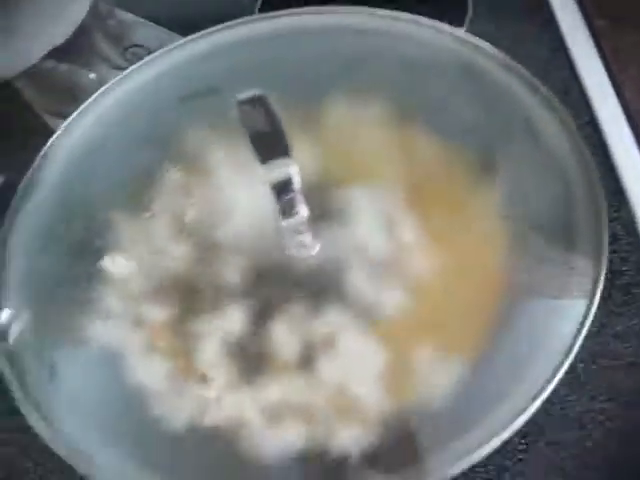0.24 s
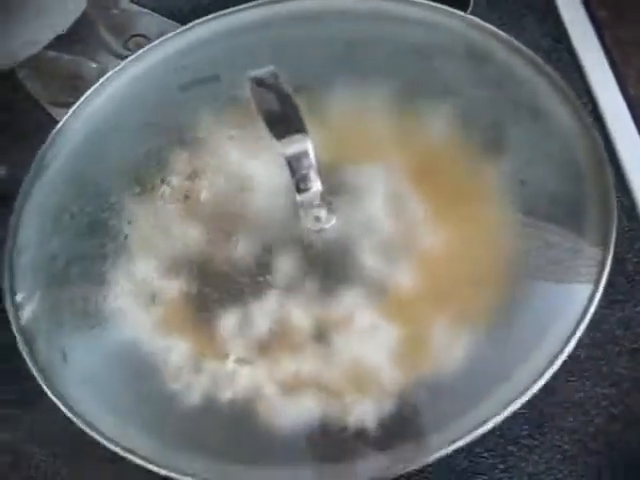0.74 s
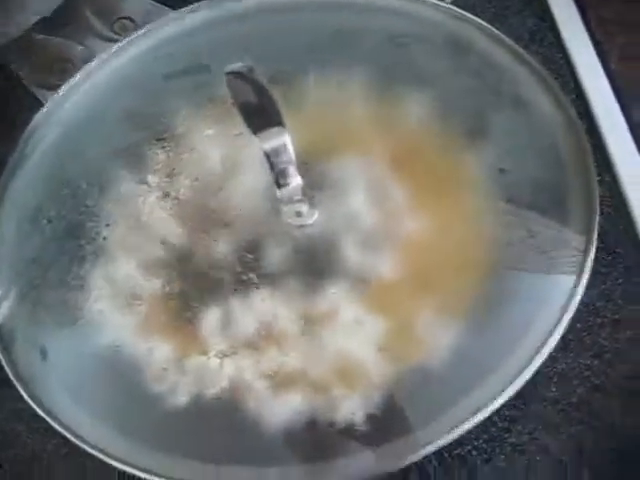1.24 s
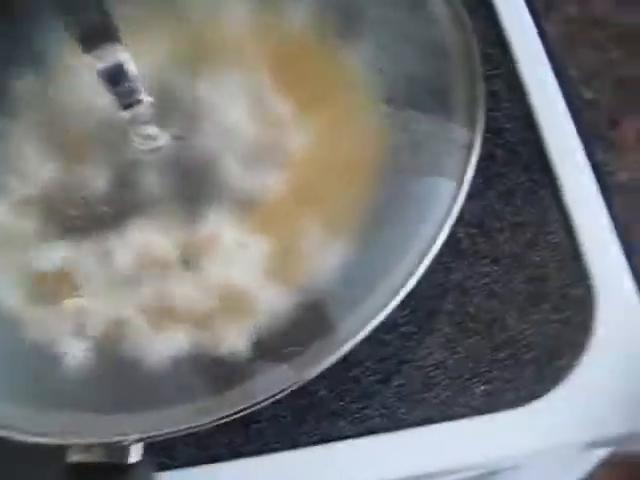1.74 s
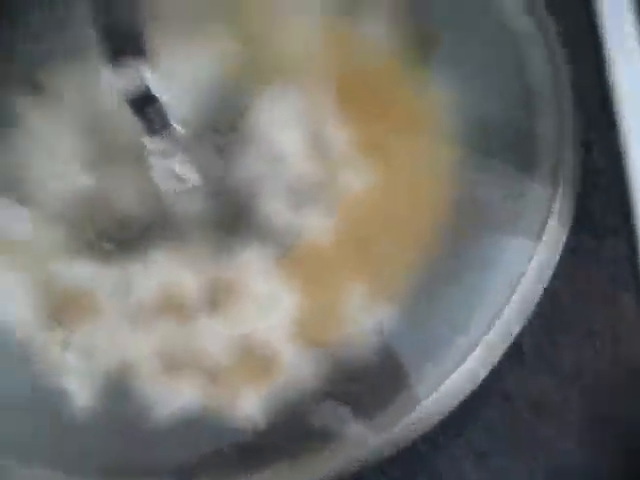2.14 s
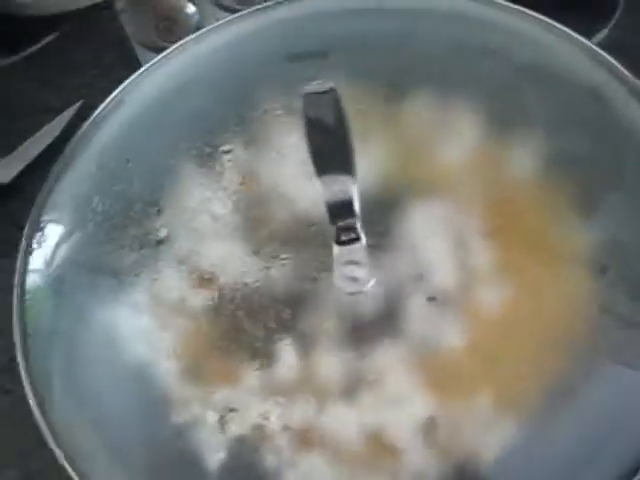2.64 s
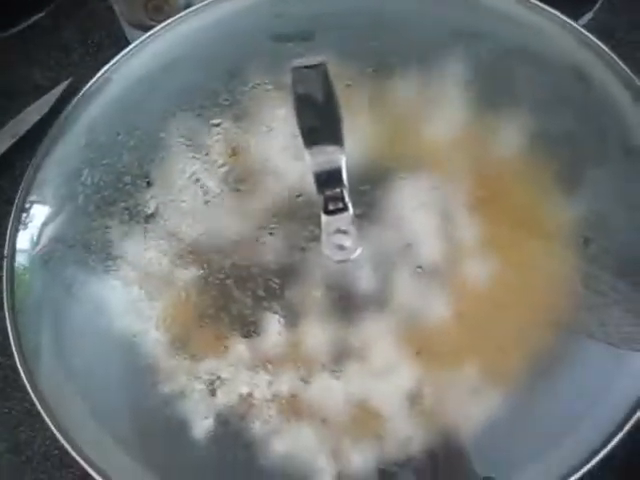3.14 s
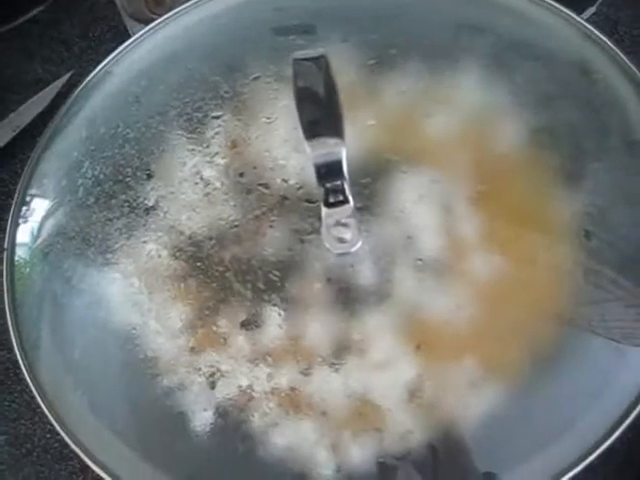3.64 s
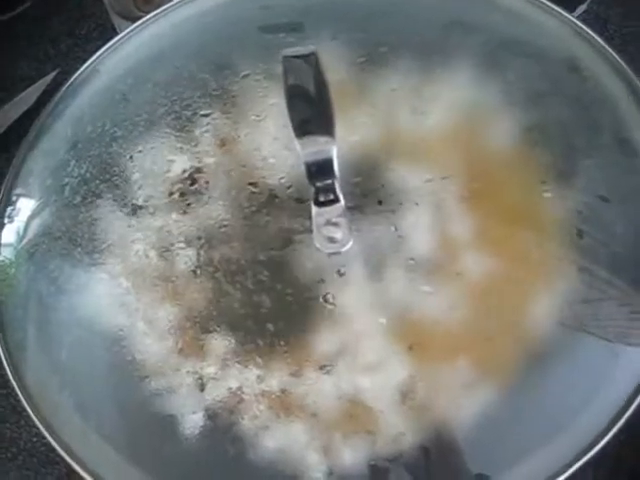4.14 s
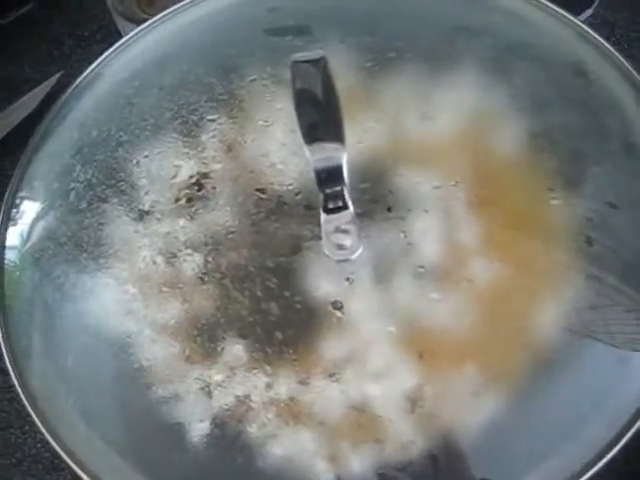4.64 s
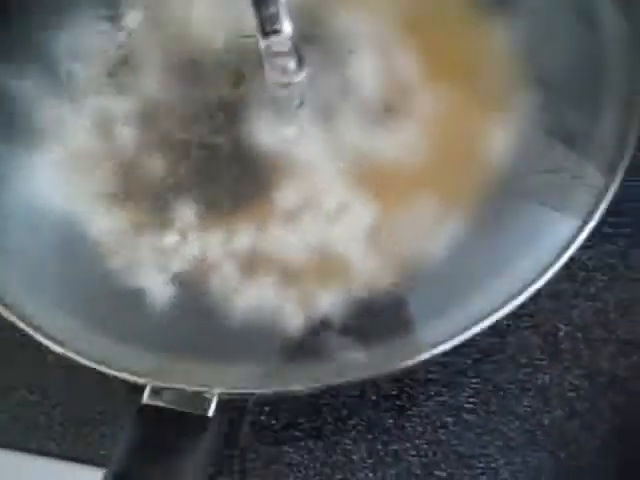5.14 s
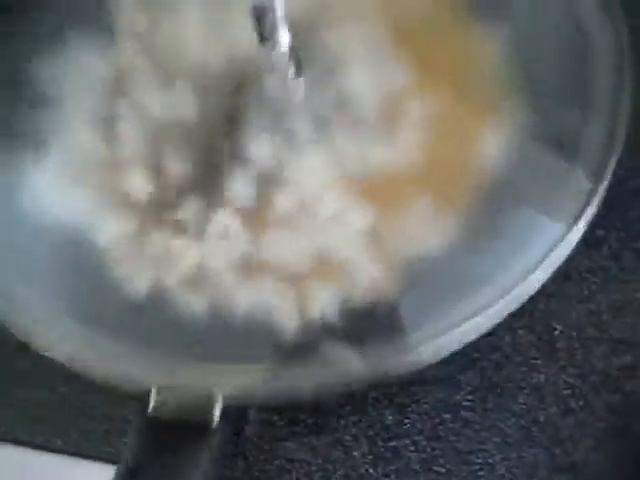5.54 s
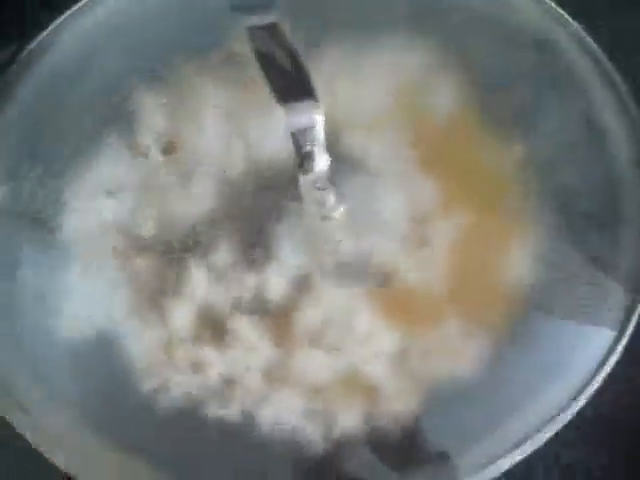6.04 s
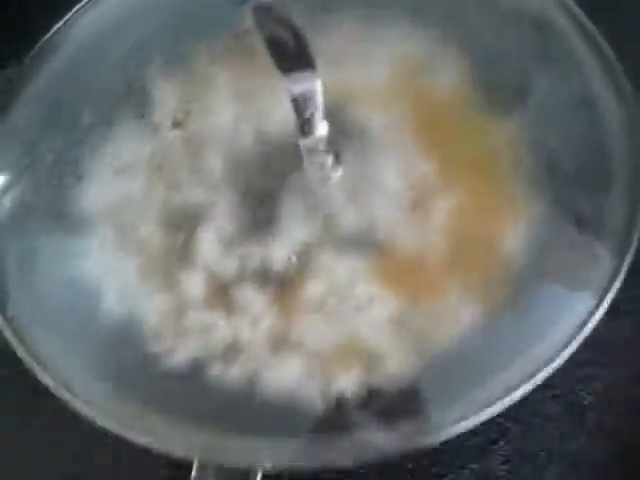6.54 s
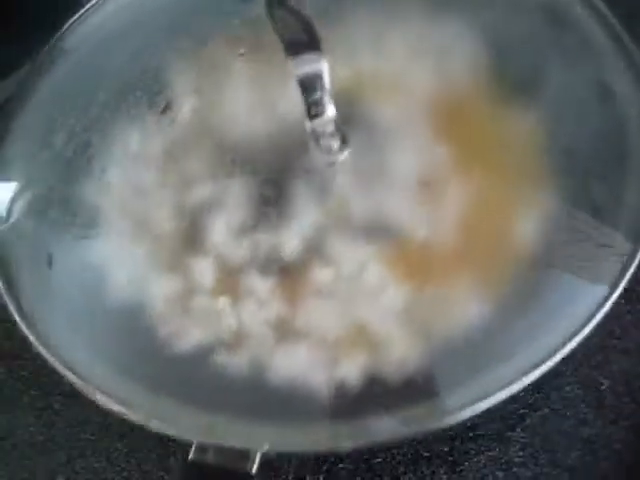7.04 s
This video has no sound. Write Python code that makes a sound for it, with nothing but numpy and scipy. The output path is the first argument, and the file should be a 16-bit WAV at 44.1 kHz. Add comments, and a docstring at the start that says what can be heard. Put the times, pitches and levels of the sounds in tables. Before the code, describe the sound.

Corn pops in a frying pan under a glass lid, heard close up in a slightly reverberant kitchen. A soft oil sizzle and the faint hum and thin high whine of an electric hob run throughout. From the start, pops come irregularly, several a second, ranging from dry snaps to steamy bursts, each with a small thump and hollow ring. Flying kernels knock and clink against lid and pan, and loose corn swishes around during the first second. Popping pauses briefly from about 2.6 to 3 seconds, then returns in a dense cluster with a sharp knock near 3.5 seconds. Between 4 and 5.2 seconds only a couple of pops break the sizzle. Then the corn slides in repeated swishes, the pan bumps dully on the hob, and popping resumes, with the loudest knocks around 5.7 and 6 seconds. The last pops fall near 6.8 seconds, followed by a final swish.

```python
"""Corn pops in a frying pan under a glass lid, on an electric hob, close to a hand-held microphone.
Each bursting kernel is an impulsive source: its hull cracks, steam fizzes out, the pan thumps and the
air under the lid resonates. Flying kernels knock on lid and pan and excite their modes. Loose corn
slides in swishes and the pan bumps the hob, all in a reverberant kitchen. Beneath this, oil sizzles
and the hob hums and whines."""
import sys
import numpy as np
from scipy import signal
from scipy.io import wavfile
from scipy.ndimage import uniform_filter1d, minimum_filter1d

SR = 44100
rng = np.random.default_rng(int(sys.argv[2]) if len(sys.argv) > 2 else 0)


def materialize(psi):
    """Save the field psi as 16-bit PCM at rate SR to the path in sys.argv[1].

    A 1-D psi becomes a single channel; in a 2-D psi each row is a channel.
    """
    bounded = np.clip(np.atleast_2d(psi).T, -1, 1)
    quanta = np.round(bounded * 32767).astype(np.int16)
    wavfile.write(sys.argv[1], SR, quanta)


N = 321930
AGE = np.arange(SR // 2) / SR  # seconds since a blow

# Mains hum and whines of the hob. Each row: frequency in Hz, level in dB, rms waver in Hz.
HOB_TONES = [(59, -59.5, 1.2), (7560, -55.5, 1), (7853, -56, 1), (7882, -60, 1)]
# Spectrum of the oil and the room's hush. Each row: frequency in Hz, relative level in dB.
SIZZLE_SPECTRUM = [(20, -3), (45, -23), (80, -3.5), (130, 1.5), (250, 0.5), (520, 4.5), (700, 1), (900, 3),
                   (1200, -1), (3200, 1), (5500, -1), (7000, -7), (11000, -5), (15000, -15.5)]
# Reverberation of the kitchen. Each row: frequency in Hz, time to decay by 60 dB (t60) in seconds.
ROOM_DECAY = [(150, 0.43), (500, 0.92), (2000, 0.56), (5000, 0.41), (12000, 0.29)]

# Modes of lid and pan together. Each row: frequency in Hz, relative level in dB, t60 in seconds.
COVERED_PAN_MODES = [(903, 29, 0.057), (1256, -4, 0.46), (1396, -20.5, 0.38), (1798, 13.5, 0.078),
                     (1930, -21, 0.21), (2296, -18, 0.14), (2360, 5.5, 0.32), (2520, -19, 0.1),
                     (2840, -43, 0.1), (2940, 12.5, 0.11), (3440, 6, 0.078), (3470, -9, 0.56),
                     (3755, 12, 0.17), (4040, 2.5, 0.19), (4640, -20, 0.24), (5050, -46, 0.27),
                     (5380, 4, 0.083), (5750, -61, .16)]
# Low modes of the pan on its hob. Each row: frequency in Hz, relative level in dB, t60 in seconds.
LOW_PAN_MODES = [(117, -25, 0.036), (163.6, 0, 0.053), (267, 5.5, 0.031), (342, 3, 0.021)]
# Modes of the lid after a knock. Each row: frequency in Hz, relative level in dB, t60 in seconds.
CLINK_MODES = [(955, 7, .06), (1418, -3, 0.096), (1900, 6.5, 0.056), (1970, -20.5, 0.86),
               (2260, -7.5, 0.14), (2470, -6.5, 0.14), (2780, 0, 0.21), (2900, 6, 0.15), (3750, 6, .2),
               (5680, 6, 0.067)]
# Modes of the air under the lid. Each row: frequency in Hz, relative level in dB, t60 in seconds.
CAVITY_MODES = [(897, -3.5, 0.067), (1449, -3.5, 0.074)]

# Dull bumps of the pan on the hob. Each row: start in seconds, level in dB.
PAN_BUMPS = [(0.332, -50.5), (.826, -44), (5.314, -30.5), (5.414, -37), (5.758, -31), (5.913, -32.5),
             (6.438, -40.5), (6.908, -37.5)]
# Slides of loose corn. Each row: start in seconds, length in seconds, top level in dB before flutter.
CORN_SLIDES = [(-.07, 0.17, -25), (0.044, 0.18, -32.5), (0.223, .27, -28.5), (0.469, 0.24, -24),
               (.74, .17, -27), (0.849, 0.28, -37), (1.93, 0.15, -34), (2.327, 0.19, -29),
               (3.241, 0.091, -28), (3.802, 0.22, -29), (5.009, 0.36, -34), (5.299, 0.17, -24),
               (5.449, 0.23, -30.5), (5.623, .15, -23), (5.724, 0.26, -33.5), (5.86, 0.14, -29.5),
               (5.932, 0.19, -25), (6.204, 0.29, -27.5), (6.468, 0.27, -31.5), (6.71, .19, -24.5),
               (6.863, 0.11, -37), (6.964, 0.095, -31.5), (7.013, 0.22, -27)]
# Spectrum of sliding friction. Each row: frequency in Hz, relative level in dB.
FRICTION_SPECTRUM = [(50, -21), (110, 2.5), (240, 7), (480, 0.5), (750, 0.5), (1150, 0), (1800, 0.5),
                     (2800, -2), (4000, -3), (5800, -3.5), (7000, -11), (11000, -11.5), (15000, -27)]
# Kernels hitting lid or pan. Each row: start in seconds, level in dB, centre frequency in Hz
# (higher for a harder contact), clink level in dB.
KERNEL_HITS = [(.1495, -12, 2650, -26), (.199, -28.5, 2250, -37), (.675, -16.5, 2270, -16.5),
               (0.691, -23, 2220, -20), (.8251, -14, 1470, -20.5), (1.165, -28.5, 2270, -50),
               (1.312, -22, 1880, -23), (1.4507, -24.5, 1930, -20.5), (1.763, -36, 2730, -55),
               (2.371, -33, 2400, -20), (2.383, -22, 2380, -29), (3.02, -35.5, 2280, -37),
               (3.094, -23, 2380, -41), (3.15, -27, 2200, -31.5), (3.258, -25, 2070, -15.5),
               (3.275, -20, 2600, -23), (3.289, -23.5, 1650, -36), (3.45, -8, 2500, -23),
               (3.829, -26.5, 2340, -28), (3.862, -24.5, 2700, -22), (3.912, -29, 2230, -23),
               (3.946, -26.5, 2210, -26.5), (4.056, -44, 1820, -33), (4.38, -42, 5600, -42),
               (5.181, -30, 2270, -49), (5.255, -22, 1950, -20.5), (5.313, -16.5, 1830, -30),
               (5.455, -28.5, 1970, -36), (5.718, -7.5, 2040, -24), (5.97, -23, 2100, -25),
               (6.0483, -5.5, 4960, -24), (6.119, -23.5, 2570, -36), (6.2249, -12, 2300, -18.5),
               (6.533, -31.5, 1300, -35), (6.757, -19, 2270, -34), (6.823, -28, 1470, -44),
               (6.843, -30, 1940, -40)]
# Band of lid modes that a knock excites. Each row: knock level in dB, half-width in octaves.
CLINK_BANDWIDTH = [(-19, 0.096), (5, 0.22)]
# Bursting kernels. Each row: start in seconds, crack level in dB, wetness from 0 (dry snap) to
# 1 (slow, steamy burst), thump level in dB, level of the air under the lid in dB.
BURSTS = [(0.0853, -15.5, 0.11, -30, -31), (.149, -22.5, 0.35, -46, -47), (.264, -21, 0.37, -44, -28.5),
          (.41, -23.5, 0.56, -36.5, -38), (0.467, -21.5, 0.73, -34, -23), (.656, -35, 0.7, -39, -30),
          (1.055, -22, 0.89, -45, -32.5), (1.142, -31, 0.26, -42, -34), (1.2879, -17.5, 0.45, -34.5, -34),
          (1.4209, -18.5, 0.58, -36.5, -30), (1.554, -32.5, 0.5, -62, -41), (1.675, -27.5, 0.77, -44, -30),
          (1.7, -18, 0.25, -41.5, -28.5), (1.879, -26.5, 0.74, -37, -31.5), (2.074, -20, 0.04, -49, -27),
          (2.188, -21.5, 0.73, -43, -25), (2.304, -25.5, 0.5, -37, -36), (2.347, -19.5, 0.64, -33, -27.5),
          (2.431, -31, 0.7, -42, -30.5), (2.469, -18.5, 0.42, -23, -28), (2.59, -32, 0.75, -62, -47),
          (3.065, -27, 0.56, -32.5, -28.5), (3.242, -16.5, 0.22, -28, -26), (3.31, -22.5, 1, -50, -47),
          (3.434, -23, .55, -38, -26), (3.765, -33, .8, -45, -32), (3.823, -22, 0.59, -32.5, -29),
          (3.888, -18, .6, -34, -29), (3.977, -22, 0.19, -33.5, -25), (4.168, -33, 0.01, -48, -44),
          (4.467, -21, 0.82, -37, -28.5), (5.228, -17.5, 0.43, -39, -45), (5.354, -19, .7, -29.5, -26),
          (5.95, -16.5, 0.6, -25, -28), (6.047, -15, 0.3, -29, -52), (6.206, -26, 0.6, -28, -37),
          (6.478, -27, .6, -47, -38), (6.7141, -14.5, 0, -31, -25), (6.794, -27.5, 0.74, -32.5, -28)]
# Spectrum of the cracking hull. Each row: frequency in Hz, relative level in dB.
HULL_SPECTRUM = [(200, -14), (450, -4.5), (700, 0), (1100, -12.5), (1800, -4.5), (3000, -6), (5500, -9.5),
                 (6300, -12), (7000, -14), (10000, -22), (15000, -85)]
# Spectrum of escaping steam. Each row: frequency in Hz, relative level in dB.
STEAM_SPECTRUM = [(3000, -25), (5500, -8), (7000, -2), (9000, -1), (11000, 2), (12500, -2), (14000, -17),
                  (16000, -34)]

SIZZLE_DB, ROOM_DB = -41.5, -14.0
THUMP_CUT_HZ, KNOCK_TOP_HZ = 92, 6400  # the pan radiates little below, the lid passes little above
CONTACT_CYCLES = 0.6  # crumpling time of a puffed kernel, in periods of the knock's centre frequency
# Pairs run from a dry snap to a wet burst. Fizz, rustle and landing levels are relative to the crack.
TEAR_S, CRACK_HZ, FIZZ_DB = (0.0003, 0.0052), (2400, 4370), (-26, -6)
RUSTLE_DB, LANDING_DB, LANDING_CHANCE = -21.5, -16.5, 0.45
LANDING_AFTER_S, LANDING_HZ = (0.017, 0.14), (1110, 2600)  # least and most
LIMIT_DB, RECOVERY_DB_PER_S, BANDWIDTH_HZ = 2.5, 110, 15700


def amp(db):
    """Amplitude ratio of a level in decibels."""
    return 10 ** (np.asarray(db) / 20)


def unit(x):
    """Normalisation to rms 1."""
    return x / np.sqrt(np.mean(x ** 2) + 1e-20)


def struck(x, db):
    """Normalisation of a transient to an rms level over its first 20 ms."""
    return amp(db) * x / np.sqrt(np.mean(x[:SR // 50] ** 2) + 1e-20)


def between(ends, share):
    """Linear interpolation, a share of the way from one end to the other."""
    return np.interp(share, [0, 1], ends)


def at_frequency(points, hz):
    """Interpolation of a table on a logarithmic frequency axis."""
    table_hz, value = np.transpose(points)
    return np.interp(np.log(hz + 1), np.log(table_hz + 1), value)


def add(mix, start_s, sound):
    """Superposition: a sound adds to the mix from its start time on."""
    at = round(start_s * SR)
    sound = sound[max(-at, 0):]
    part = mix[max(at, 0):][:len(sound)]
    part += sound[:len(part)]


def fade(t60):
    """Exponential damping, by 60 dB in t60 seconds."""
    return np.exp(-np.log(1000) * AGE / t60)


def colour(x, spectrum):
    """Minimum-phase filtering: shapes the spectrum with no response ahead of its cause."""
    hz = abs(np.fft.fftfreq(2048, 1 / SR))
    log_gain = np.log(amp(at_frequency(spectrum, hz)))
    taps = np.fft.ifft(np.exp(np.conj(signal.hilbert(log_gain)))).real
    return signal.oaconvolve(x, taps[:len(taps) // 2])[:len(x)]


def resonate(x, hz, q):
    """Second-order resonance of bandwidth hz / q."""
    return signal.lfilter(*signal.iirpeak(min(hz, SR / 4), max(q, .3), fs=SR), x)


def drift(per_s):
    """Random modulation of rms 1, linear between per_s values a second."""
    knots = rng.standard_normal(int(N / SR * per_s) + 2)
    return unit(np.interp(np.arange(N) * per_s / SR, np.arange(len(knots)), knots))


def grains(size, per_s, spread_db):
    """Shot noise: independent tiny clicks of very unequal strength."""
    strength = amp(spread_db * np.minimum(rng.exponential(1, size), 5))
    return unit(rng.standard_normal(size) * strength * (rng.random(size) < per_s / SR))


def fractures(seconds):
    """Brittle fracture: a quick run of tiny breaks, strongest early, on the given time scale."""
    progress = AGE[:SR // 20] / seconds
    return rng.standard_normal(len(progress)) * (progress + 0.32) * np.exp(-1.25 * progress)


def ring(modes, spread_db):
    """Free vibration: the place of a blow sets each mode's sign and strength; the load detunes it."""
    weights = rng.choice([-1, 1], len(modes)) * amp(spread_db * rng.standard_normal(len(modes)))
    detunes = 1 + .006 * rng.standard_normal(len(modes))
    return sum(weight * amp(db) * fade(t60) * np.sin(2 * np.pi * hz * detune * AGE)
               for weight, detune, (hz, db, t60) in zip(weights, detunes, modes))


def hob():
    """Line spectrum: mains hum and thin whines, each slightly modulated in frequency."""
    out = np.zeros(N)
    for hz, db, waver_hz in HOB_TONES:
        phase = 2 * np.pi * np.cumsum(hz + waver_hz * drift(per_s=1.7)) / SR
        out += np.sqrt(2) * amp(db) * np.sin(phase)
    return out


def sizzle():
    """Stationary noise: the fine clicks of frying oil merge with the hush of the kitchen."""
    frying = rng.standard_normal(N) + 0.23 * grains(N, per_s=5000, spread_db=3.0)
    return amp(SIZZLE_DB) * unit(colour(frying, SIZZLE_SPECTRUM))


def kitchen(x):
    """Reverberation: the diffuse field of a small room decays at its own rate in each band."""
    hz, t, bands = signal.stft(rng.standard_normal(len(AGE)), SR, nperseg=256)
    decay = np.exp(-np.log(1000) * t / at_frequency(ROOM_DECAY, hz)[:, None])
    tail = signal.istft(bands * decay, SR)[1][:len(AGE)]
    tail *= 1 - np.exp(-(AGE / 0.0062) ** 2)  # wall reflections take milliseconds to arrive
    return signal.oaconvolve(x, tail / np.linalg.norm(tail))[:N]


def pan_response(echo_db, echo_t60, modes_db):
    """Impulse response: direct sound, dense echoes under the lid, and the modes of lid and pan."""
    direct = AGE == 0
    echoes = rng.standard_normal(len(AGE)) * fade(echo_t60)
    modes = ring(COVERED_PAN_MODES, spread_db=3.0)
    return (direct + amp(echo_db) * echoes / np.linalg.norm(echoes)
            + amp(modes_db) * modes / np.linalg.norm(modes))


def thump(swell, db):
    """Radiation from a small body: pushed on the hob, the pan rings low but sheds little deep bass."""
    vibration = swell * ring(LOW_PAN_MODES, spread_db=1.0)
    radiation = signal.butter(2, THUMP_CUT_HZ, "highpass", fs=SR, output="sos")
    return struck(signal.sosfilt(radiation, vibration), db)


def bumps():
    """Gradual excitation: the pan nudges the hob, and the slow onset makes a dull sound."""
    out = np.zeros(N)
    swell = 1 - np.exp(-AGE / 0.0095)
    for start_s, db in PAN_BUMPS:
        add(out, start_s, thump(swell, db))
    return out


def swish(length_s, rise_share, db, hz):
    """Friction noise: tiny contacts excite two spots of the pan, louder as the corn slides faster."""
    t = np.arange(0, length_s, 1 / SR)
    speed = np.sin(np.pi / 2 * np.interp(t / length_s, [0, rise_share, 1], [0, 1, 0]))
    rubbing = 0
    for _ in range(2):
        contacts = grains(SR, per_s=1500, spread_db=3.5)
        spot = pan_response(echo_db=6.0, echo_t60=0.067, modes_db=-16.0)
        rubbing += signal.fftconvolve(contacts, spot)
    steady = colour(rubbing[SR // 4:][:len(t)], FRICTION_SPECTRUM)
    return amp(db) * speed ** 1.09 * unit(resonate(steady, hz, q=0.56))


def sliding_corn():
    """Stick-slip motion: the heap catches and slips as it slides, and as it settles after each burst."""
    out = np.zeros(N)
    flutter = amp(1.14 * drift(per_s=45))
    for start_s, length_s, db in CORN_SLIDES:
        add(out, start_s, swish(length_s, rise_share=0.36, db=db, hz=1360))
    for start_s, crack_db, *_ in BURSTS:
        add(out, start_s, swish(length_s=0.17, rise_share=0.05, db=crack_db + RUSTLE_DB, hz=1740))
    return out * flutter


def knock(db, hz, clink_db):
    """Band-limited impact: lid modes near the contact's band clink on, more of them after a hard hit."""
    rim_echoes = rng.standard_normal(len(AGE)) * fade(t60=0.026)
    response = pan_response(echo_db=0.5, echo_t60=0.044, modes_db=-13.5)
    response += amp(4) * rim_echoes / np.linalg.norm(rim_echoes)
    blow = signal.fftconvolve(response, fractures(CONTACT_CYCLES / hz))[:len(AGE)]
    blow = signal.sosfilt(signal.butter(3, KNOCK_TOP_HZ, fs=SR, output="sos"), blow)
    blow = resonate(resonate(blow, hz, q=2.2), hz, q=1.3)
    octaves = np.interp(db, *np.transpose(CLINK_BANDWIDTH))
    excited = [(mode_hz, mode_db - 10 * np.log10(1 + (np.log2(mode_hz / hz) / octaves) ** 4), t60)
               for mode_hz, mode_db, t60 in CLINK_MODES]
    clink = ring(excited, spread_db=2.5)
    return struck(blow, db) + struck(clink, clink_db)


def flying_kernels():
    """Collisions: kernels strike lid and pan, and some land softly a short flight after a burst."""
    out = np.zeros(N)
    for start_s, db, hz, clink_db in KERNEL_HITS:
        add(out, start_s, knock(db, hz, clink_db))
    for (start_s, crack_db, *_), (luck, flight, hardness) in zip(BURSTS, rng.random((len(BURSTS), 3))):
        if luck < LANDING_CHANCE:
            db = crack_db + LANDING_DB
            landing = knock(db, between(LANDING_HZ, hardness), clink_db=db)
            add(out, start_s + between(LANDING_AFTER_S, flight), landing)
    return out


def hull_crack(tear, wetness, db):
    """Convolution: each fracture of the hull sets off the impulse response of the covered pan."""
    response = pan_response(echo_db=3.5, echo_t60=0.087, modes_db=-7)
    crack = colour(signal.fftconvolve(tear, response)[:len(AGE)], HULL_SPECTRUM)
    return struck(resonate(crack, between(CRACK_HZ, wetness), q=1.13), db)


def steam_fizz(tear, db):
    """Jet noise: steam escapes through the tear in a brief hiss that echoes under the lid."""
    response = pan_response(echo_db=-1, echo_t60=.048, modes_db=-20)
    steam = signal.fftconvolve(tear, response)[:len(AGE)]
    return struck(colour(steam, STEAM_SPECTRUM), db)


def enclosed_air(swell, db):
    """Cavity resonance: the air under the lid rings, retuned each time by the shifting heap of corn."""
    detune = 1 + 0.023 * rng.standard_normal()
    modes = [(hz * detune, mode_db, t60) for hz, mode_db, t60 in CAVITY_MODES]
    return struck(swell * ring(modes, spread_db=3.5), db)


def pops():
    """Sudden pressure release drives hull, steam, pan and air; a wet kernel tears slower, fizzes more."""
    out = np.zeros(N)
    swell = 1 - np.exp(-AGE / 0.00053)  # pressure builds as the kernel opens
    for start_s, crack_db, wetness, thump_db, air_db in BURSTS:
        tear = fractures(between(TEAR_S, wetness))
        crack = hull_crack(tear, wetness, crack_db)
        fizz = steam_fizz(tear, crack_db + between(FIZZ_DB, wetness))
        add(out, start_s, crack + fizz + thump(swell, thump_db) + enclosed_air(swell, air_db))
    return out


def scene():
    """Superposition in one channel: corn and pan with their reverberation, over sizzle and hob."""
    direct = pops() + flying_kernels() + bumps() + sliding_corn()
    return (direct + amp(ROOM_DB) * kitchen(direct) + sizzle() + hob())[None]


def record(dry):
    """Peak limiting: a fast gain dip and soft saturation hold blows near full scale; then a low-pass."""
    level_db = 20 * np.log10(abs(dry[0]) + 1e-9)
    recovery_db = np.arange(N) / SR * RECOVERY_DB_PER_S
    held_peak_db = np.maximum.accumulate(level_db + recovery_db) - recovery_db
    gain_db = np.minimum(LIMIT_DB - held_peak_db, 0)
    smooth_gain_db = uniform_filter1d(minimum_filter1d(gain_db, size=31), size=31)
    limited = dry * amp(smooth_gain_db)
    saturated = limited / (1 + limited ** 8) ** (1 / 8)
    lowpass = signal.firwin(511, BANDWIDTH_HZ, window=("kaiser", 9), fs=SR)
    return signal.oaconvolve(saturated, lowpass[None], "same")


dry = scene()
out = record(dry)
materialize(out)
```